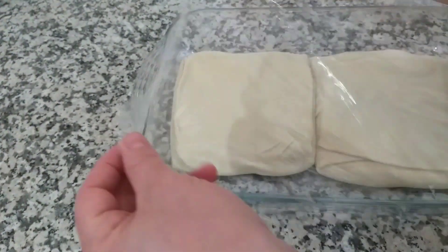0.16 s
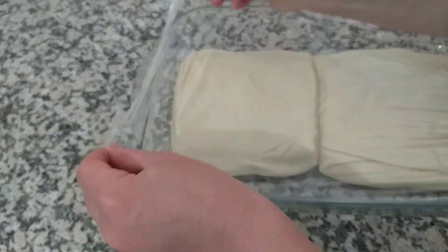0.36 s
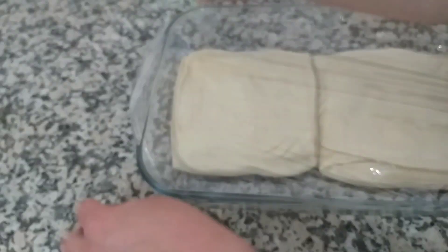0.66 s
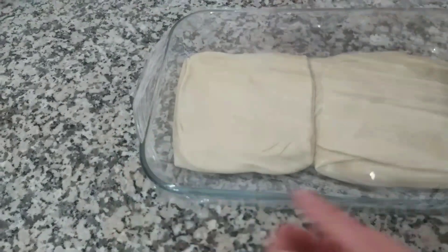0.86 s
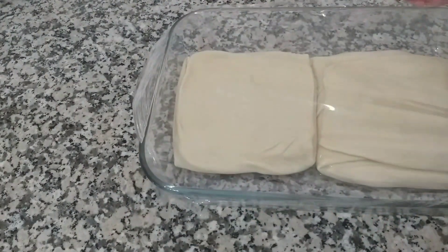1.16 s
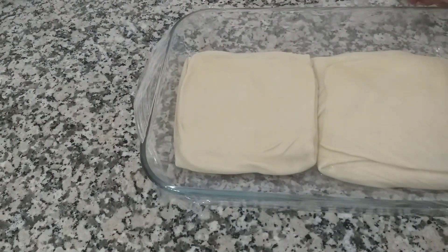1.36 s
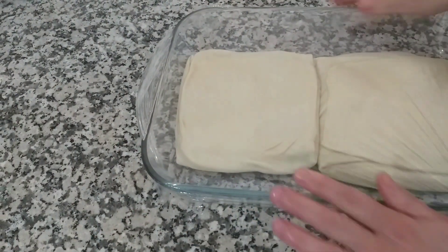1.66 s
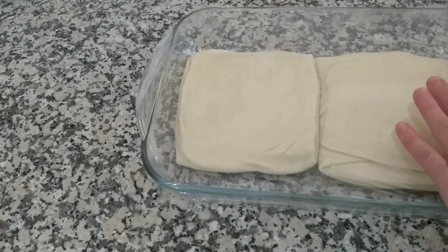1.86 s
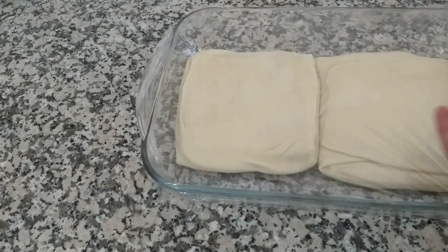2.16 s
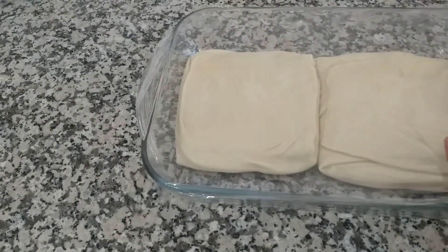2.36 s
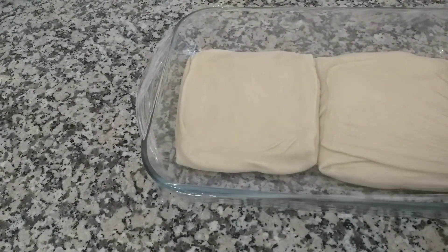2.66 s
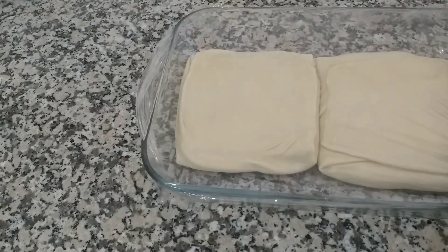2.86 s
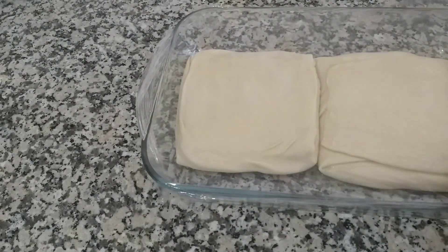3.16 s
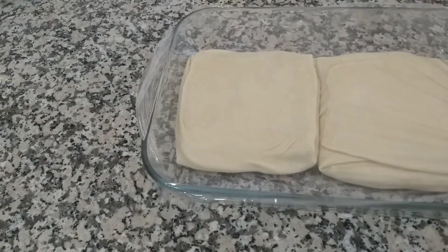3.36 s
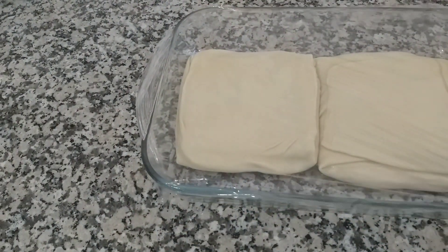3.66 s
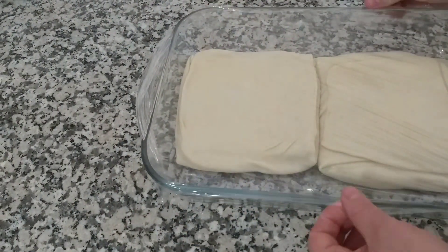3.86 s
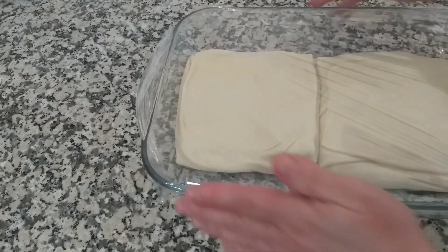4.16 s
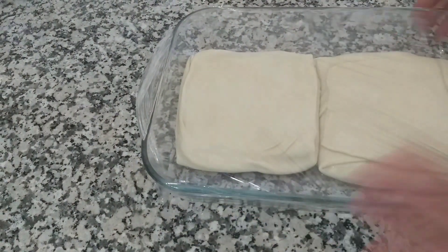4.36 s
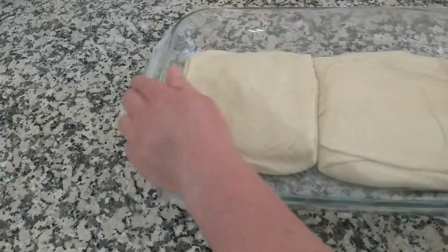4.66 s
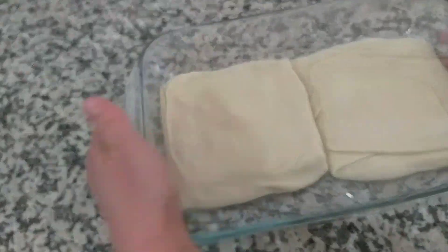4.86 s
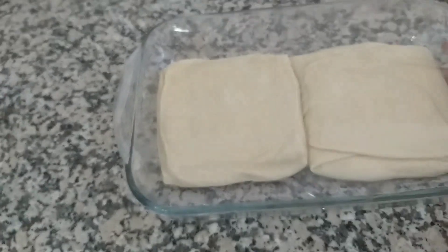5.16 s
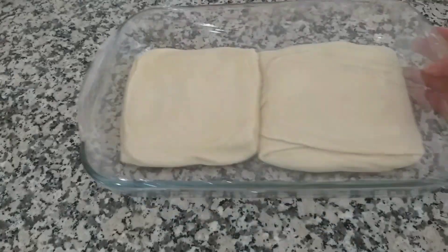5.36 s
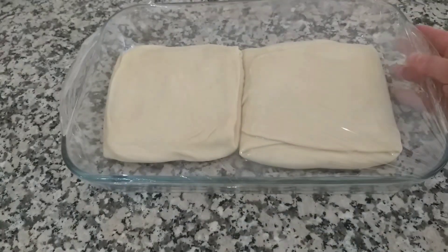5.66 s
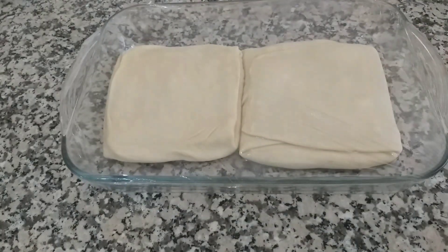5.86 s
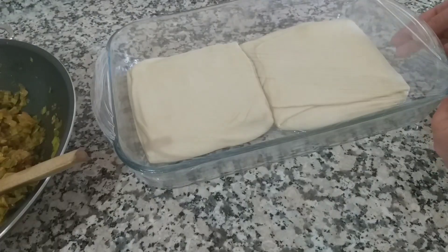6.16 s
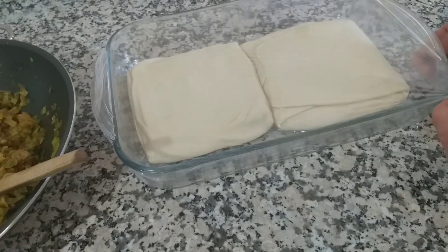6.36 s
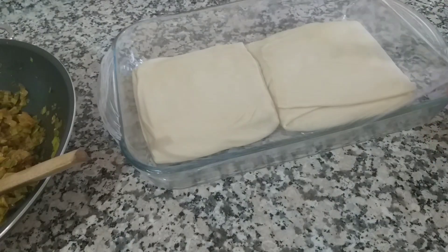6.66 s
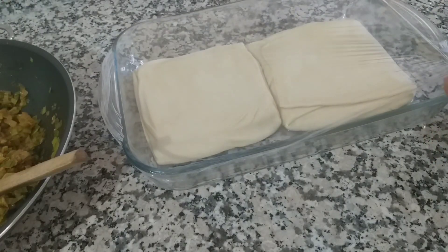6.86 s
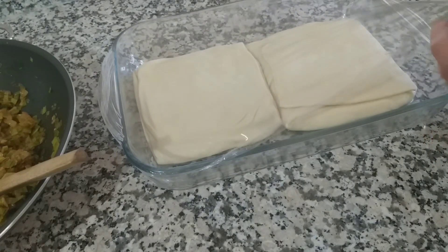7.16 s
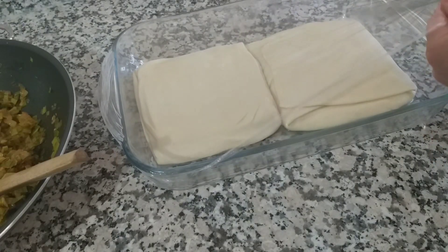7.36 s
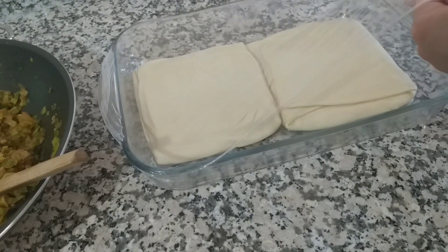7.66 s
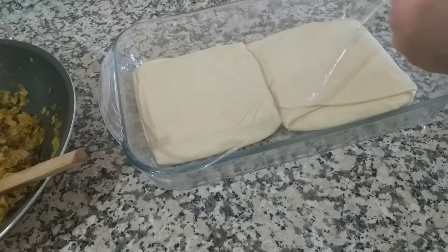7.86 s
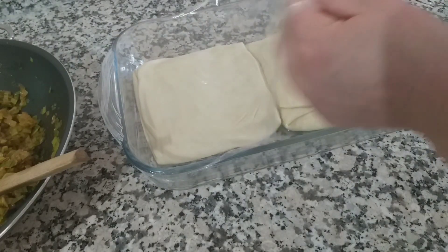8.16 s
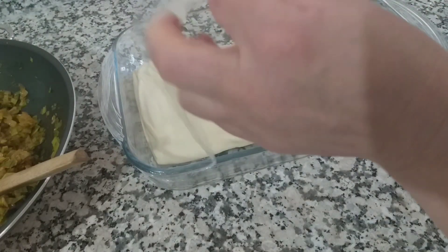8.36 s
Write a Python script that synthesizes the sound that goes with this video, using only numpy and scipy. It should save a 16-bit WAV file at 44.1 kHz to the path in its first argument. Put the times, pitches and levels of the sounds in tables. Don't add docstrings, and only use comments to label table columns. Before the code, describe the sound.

Close and dry in a quiet kitchen: plastic film crinkles, scuffs and snaps under busy hands, with low soft bumps on the counter. The densest crackle comes before three seconds, followed by lighter patting and isolated clicks. Around five seconds the glass dish slides with a low, rough scrape. A very brief dropout follows, then a faint low hum and peeling film, with one dense crackling burst and later scattered rustles.

```python
import sys
import numpy as np
from scipy import signal
from scipy.io import wavfile

SR = 44100
rng = np.random.default_rng(int(sys.argv[2]) if len(sys.argv) > 2 else 0)


def unload_wav(signal):
    wavfile.write(
        sys.argv[1],
        SR,
        np.round(np.clip(np.atleast_2d(signal).T, -1, 1) * 32767).astype(np.int16),
    )


def gain_from_db(level_db):
    decades = np.asarray(level_db, float) / 20
    return 10 ** decades


N = 375291
GAP_START_S, GAP_END_S = 5.989, 6.027


def rms_one(x):
    return x / np.sqrt(np.mean(x ** 2) + 1e-20)


def in_time(rows):
    s, *columns = np.transpose(rows)
    return [np.interp(np.arange(N) / SR, s, column) for column in columns]


def drift(rate):
    r = np.exp(-40 * np.pi * rate / SR)
    noise = rng.standard_normal(N // 20 + 2002)
    slow = signal.lfilter([1], [1, -2 * r, r * r], noise)[2000:]
    return np.interp(np.arange(N) / 20, np.arange(len(slow)), rms_one(slow))


def resonance(x, hz, width):
    r = np.exp(-np.pi * width / SR)
    poles = [1, -2 * r * np.cos(2 * np.pi * hz / SR), r * r]
    return signal.lfilter([(1 - r * r) / 2, 0, (r * r - 1) / 2], poles, x + 1e-18)


def band(x, low_hz, high_hz):
    return signal.sosfilt(signal.butter(2, [low_hz, high_hz], "band", fs=SR, output="sos"), x)


# f/Hz, density level/dB per Hz
AIR_SPECTRUM = [(30, 0.5), (120, -7), (300, -6), (700, -20.5), (1600, -5.5), (6000, -30), (16000, -34)]


def room_tone():
    white = rng.standard_normal((2, N))
    edges = 22 * 2 ** np.arange(0, 9.6, .5)
    hz, level_db = np.transpose(AIR_SPECTRUM)
    centres = edges[:-1] * 2 ** .25
    gains = gain_from_db(np.interp(np.log(centres), np.log(hz), level_db))
    air = sum(g * band(white[k % 2], edges[k], edges[k + 1]) for k, g in enumerate(gains))
    return gain_from_db(-80.5) * rms_one(air)


# f/Hz, level/dB
HUM_LINES = [(69, -77), (102, -78), (205, -83), (262, -83.5), (320, -89.5)]


def appliance_hum():
    drone = np.zeros(N)
    for hz, db in HUM_LINES:
        level = gain_from_db(db + 3.0 + 0.98 * drift(4.4))
        phase = 2 * np.pi * np.cumsum(hz * (1 + 0.0192 * drift(4.2))) / SR
        drone += level * np.sin(phase)
    return drone * (np.arange(N) > GAP_END_S * SR)


def kitchen(x):
    t60_s, wall_cut_hz = 0.077, 3100
    t = np.arange(round(.25 * SR)) / SR
    decay = gain_from_db(-60 * t / t60_s) * (t > .002)
    echoes = band(rng.standard_normal(len(t)), 67, wall_cut_hz) * decay
    return signal.fftconvolve(x, echoes / np.sqrt(np.sum(echoes ** 2)))[:N]


def rumble():
    low = band(band(rng.standard_normal(N), 70, 160), 45, 180)
    return gain_from_db(-75.5 + 2.0 * drift(7.5)) * rms_one(low)


# t/s, peak level/dB
HAND_THUMPS = [(0.113, -59.5), (0.73, -66), (1.298, -59), (1.488, -63), (1.601, -49), (2.213, -60),
               (2.477, -53.5), (2.718, -77), (2.875, -54), (3.095, -69), (3.615, -54.5), (3.915, -60),
               (4.051, -71.5), (4.303, -51), (4.62, -61), (6.672, -51), (6.896, -51), (7.497, -55)]


def thumps():
    out, t = np.zeros(N), np.arange(4000) / SR
    for s, peak_db in HAND_THUMPS:
        pulse = rng.standard_normal(len(t)) * t * np.exp(-t / 0.0053)
        thud = band(band(pulse, 83, 190), 49, 180)
        at = round(s * SR)
        out[at:at + len(t)] += gain_from_db(peak_db) * thud / np.abs(thud).max()
    return out


# t/s, level/dB
SLIDE_FRICTION = [
    (4.88, -100),
    (5.02, -97.5),
    (5.12, -101),
    (5.2, -76.5),
    (5.35, -78),
    (5.55, -98),
    (5.75, -77.5),
    (5.9, -86.5),
    (5.99, -97),
]
# f/Hz, bandwidth/Hz, level/dB
DISH_MODES = [(123.3, 12, 7.5), (292, 43, -1.5), (800, 170, -4.5), (1498, 96, -3), (1834, 100, -11),
              (2300, 120, -22.5)]


def dish_slide():
    level_db = in_time(SLIDE_FRICTION)[0] + 3.14 * drift(12.4)
    friction = rng.standard_normal(N) * gain_from_db(level_db)
    friction[:int(SLIDE_FRICTION[0][0] * SR) + 1] = 0
    friction[round(GAP_START_S * SR):] = 0
    return sum(gain_from_db(db) * np.sqrt(SR / width) * resonance(friction, hz, width) for hz, width, db in DISH_MODES)


# t/s at the middle, length/s, f/Hz, level/dB
COLOURED_BURSTS = [(0.238, 0.014, 800, -45), (0.86, 0.057, 330, -68), (0.813, 0.069, 760, -61),
                   (1.28, 0.035, 1050, -48.5), (1.749, 0.02, 945, -54.5), (1.843, 0.024, 883, -48),
                   (1.863, 0.06, 360, -51.5), (1.992, 0.075, 330, -56.5), (2.223, 0.062, 349, -49),
                   (2.225, 0.079, 237, -47), (2.279, 0.018, 1360, -49), (2.655, 0.24, 1030, -63),
                   (3.134, 0.089, 230, -55.5), (4.806, 0.071, 4500, -74.5), (5.002, 0.18, 2300, -67),
                   (5.254, 0.049, 6570, -68.5), (5.855, 0.05, 7140, -74.5), (4.953, 0.088, 5000, -66),
                   (1.614, 0.02, 1410, -49), (8.194, 0.16, 6030, -64.5), (8.2, 0.092, 13200, -58.5),
                   (8.41, 0.22, 1900, -63.5)]


def coloured_bursts():
    out, t = np.zeros(N), np.arange(N) / SR
    friction = rng.standard_normal(N) * gain_from_db(1.2 * drift(41))
    for s, length, hz, db in COLOURED_BURSTS:
        near = slice(round((s - 2 * length) * SR), round((s + 2 * length) * SR))
        patch = rms_one(resonance(resonance(friction[near], hz, 0.15 * hz), hz, 0.51 * hz))
        stroke = np.exp(-((t[near] - s) / (0.37 * length)) ** 4)
        out[near] += gain_from_db(db) * patch * stroke
    return out


# t/s, rustle level/dB
REST_RUSTLE = [(0, -71), (.5, -60), (.68, -69), (1.0, -70.5), (1.25, -67), (1.6, -83), (2.1, -63),
               (2.65, -58.5), (3.0, -82.5), (3.4, -67), (3.75, -75.5), (4.6, -67.5), (5.2, -70), (5.6, -79),
               (6.04, -72), (6.3, -63), (7.3, -64), (8.2, -65.5)]
# t/s at full force, hold/s, crackle level/dB, sheet level re crackle/dB
STRETCH_MOVES = [(0.08, 0.13, -45.5, -8), (0.144, 0.0065, -49.5, 13), (0.236, 0.057, -43, -8.5),
                 (0.377, 0.11, -51, -26), (0.467, 0.0049, -43.5, -5.5), (0.63, 0.0064, -43, -17),
                 (0.721, 0.084, -55, -18), (1.064, 0.038, -74, -14), (1.083, 0.13, -57, -19),
                 (1.276, 0.037, -41.5, -5), (1.341, 0.029, -43.5, -5.5), (1.395, 0.008, -47, -3),
                 (1.435, .03, -52, -1.5), (1.495, 0.0072, -47.5, 7), (1.607, 0.017, -47.5, -3),
                 (1.75, 0.17, -53.5, -5.5), (1.976, 0.029, -49, 4), (2.04, 0.038, -51.5, -4),
                 (2.133, 0.0084, -47, -2.5), (2.21, 0.029, -42, -3), (2.276, 0.0044, -47, 1.5),
                 (2.36, 0.074, -47.5, -16), (2.484, 0.0078, -45.5, 9.5), (2.697, .012, -46.5, 9.5),
                 (2.711, 0.064, -37.5, 0), (2.814, 0.02, -41.5, 1), (2.889, 0.019, -40, 1),
                 (3.095, 0.043, -39, -3), (3.158, 0.064, -40.5, -6.5), (3.199, .056, -42, -14)]
PAT_MOVES = [(3.342, 0.042, -55.5, -27), (3.38, 0.059, -51.5, -4), (3.5, 0.024, -59, -16),
             (3.605, 0.0029, -51, -12), (3.647, 0.007, -30, -16.5), (3.833, .015, -52.5, -18),
             (3.909, 0.0086, -39.5, 0), (3.919, 0.029, -48, 0), (4.045, 0.0042, -44.5, -10.5),
             (4.177, 0.02, -49.5, -21.5), (4.296, 0.034, -59, -12.5), (4.39, 0.07, -45, -13.5),
             (4.624, .01, -56, -9), (4.744, 0.021, -49.5, -18.5), (4.81, 0.026, -73, 13.5),
             (4.902, 0.15, -50.5, -30), (4.984, 0.039, -48, -6), (5.157, 0.025, -52.5, -42)]
PEEL_MOVES = [(6.09, 0.054, -56.5, -41), (6.29, 0.12, -51, -34), (6.373, .2, -49.5, -4),
              (6.593, 0.097, -37, 0), (6.688, 0.14, -51, 5.5), (6.786, 0.15, -42.5, -5.5),
              (6.888, 0.0083, -33.5, 3), (6.925, 0.11, -44, -4.5), (7.442, 0.071, -48, -36),
              (7.482, 0.11, -42, -4), (7.634, 0.0048, -36, -16), (7.657, 0.13, -47, -6),
              (7.7, 0.0056, -38.5, -10), (7.771, 0.0042, -39.5, -2.5), (8.353, 0.064, -45, -22),
              (8.432, .09, -49.5, -20)]


def handling():
    t = np.arange(0, N, 20) / SR
    rest_db = in_time(REST_RUSTLE)[0][::20]
    power = gain_from_db(rest_db + np.array([[0], [-10], [-6.5]])) ** 2
    # moves, flapping re sheet/dB, growth of rise and of fall time per second of hold
    kinds = [(STRETCH_MOVES, -9.5, 0.27, 0.12), (PAT_MOVES, -26.5, 0.035, 0.11), (PEEL_MOVES, -11.5, 0.2, 0.64)]
    for moves, flap_db, rise_per_hold, fall_per_hold in kinds:
        for s, hold, db, sheet_db in moves:
            rise_s = .009 + rise_per_hold * hold
            fall_s = 0.028 + fall_per_hold * hold
            away = np.maximum((s - t) / rise_s, (t - s - hold) / fall_s)
            force_db = db - 20 * np.clip(away, 0, 10)
            power += gain_from_db(force_db + np.array([[0], [sheet_db], [sheet_db + flap_db]])) ** 2
    return [np.interp(np.arange(N), t * SR, db) for db in 10 * np.log10(power)]


# f/Hz, bandwidth/Hz, level/dB
AIR_POCKET = [(230, 140, -3.5), (338.6, 54, -5)]


def air_pocket(busy):
    out = np.zeros(N)
    for hz, width, db in AIR_POCKET:
        push = rng.standard_normal(N) * busy
        out += gain_from_db(db - 7.5) * np.sqrt(SR / width) * resonance(push, hz, width)
    return out


def crinkle():
    crackle_db, sheet_db, flap_db = handling()
    sizes = gain_from_db(3.0 * np.minimum(rng.exponential(1, N), 5)) * rng.choice([-1, 1], N)
    busy = gain_from_db(3.8 * drift(45))
    folds_log_hz = np.log([330, 1380, 5500])
    out = np.zeros(N)
    for hz in np.geomspace(200, 15500, num=20):
        small = np.interp(np.log(hz), folds_log_hz, [0, 0, 1])
        large = np.interp(np.log(hz), folds_log_hz, [1, 0, 0])
        level_db = small * crackle_db + large * flap_db + (1 - small - large) * sheet_db
        clicks_per_s = 700 * (hz / 3000) ** .7 * busy
        clicks = np.roll(sizes, int(hz)) * (rng.random(N) < clicks_per_s / SR)
        ring = rms_one(resonance(resonance(clicks, hz, hz / 3.2), hz, hz / 2.3))
        out += ring * gain_from_db(level_db - 13.5 + 1.67 * drift(7.1))
    ticks = sizes * (rng.random(N) < 160 * busy / SR) * gain_from_db(crackle_db - 1)
    return out + band(ticks, 560, 16000) + gain_from_db(flap_db - 5.5) * air_pocket(busy)


# t/s, peak level/dB, ring f/Hz, body level re peak/dB
STRETCH_FLIPS = [(.029, -33.5, 7920, -21), (0.0573, -28, 6540, -21), (0.1176, -12.5, 3950, -5.5),
                 (.1459, -12.5, 4530, -18), (.15, -18.5, 4100, -2.5), (0.16, -28, 4570, -12),
                 (.187, -21.5, 5260, -23), (0.4681, -27, 4240, -7), (0.8975, -54.5, 5500, 9),
                 (1.1075, -32.5, 5000, -32), (1.1456, -31, 7000, -30), (1.262, -25.5, 5600, -23),
                 (1.274, -16, 5300, -6), (1.285, -20.5, 7450, -11), (1.3014, -25, 6150, -29),
                 (1.343, -23, 7450, -28), (1.3501, -20.5, 7060, -4.5), (1.3762, -36.5, 4950, 9),
                 (1.4433, -31, 5000, 0), (1.4915, -16.5, 4500, -5), (2.0484, -21, 11200, -24),
                 (2.0568, -16.5, 15100, -43), (2.0625, -13, 13340, -34), (2.1397, -31, 6100, -25),
                 (2.252, -31.5, 7670, -19), (2.356, -23.5, 5900, -37), (2.3665, -21, 3640, -41),
                 (2.376, -19.5, 3550, -38), (2.3798, -17, 13500, -38), (2.4899, -23, 3560, -20)]
PRESS_FLIPS = [(2.536, -28.5, 7400, -35), (2.5608, -24, 7244, -27.5), (2.6958, -15.5, 4970, -20),
               (2.6983, -14, 3750, -3), (2.721, 0, 3300, -8.5), (2.7234, -11, 3670, -3),
               (2.8085, -15, 4370, 3.5), (2.823, -12, 4740, -9), (2.884, -34, 5170, 19),
               (2.9007, -13.5, 5000, -26), (3.0902, -26.5, 4760, -8), (3.0964, -14.5, 5640, -16),
               (3.191, -29, 6800, -26.5), (3.392, -25, 4900, -6.5), (3.419, -40.5, 4560, -23),
               (3.4605, -38, 7400, -28), (3.5077, -32, 5080, -18), (3.518, -31.5, 7450, -40),
               (3.565, -42, 2800, -31.5), (3.597, -27.5, 2900, -27.5), (3.649, -18, 5000, -46),
               (3.6538, -20.5, 5080, -34), (3.8385, -38.5, 4750, -15), (3.9035, -17.5, 7000, -1),
               (3.92, -23.5, 4600, -29), (4.1779, -28, 5560, -32.5), (4.308, -30.5, 7850, -16),
               (5.1349, -36.5, 7600, -29.5), (5.169, -34.5, 7460, -27), (5.6558, -45, 7150, -17.5)]
PEEL_FLIPS = [(6.2599, -34, 7790, -31.5), (6.3212, -25.5, 5060, -34), (6.3343, -18, 5000, -27.5),
              (6.35, -17, 9600, -14.5), (6.377, -19, 3840, -7.5), (6.4198, -32, 5660, -6),
              (6.4813, -31, 3780, -23), (6.5181, -17.5, 5040, -4.5), (6.5507, -22.5, 4520, -41),
              (6.5636, -23.5, 4230, -1.5), (6.6106, -11.5, 3920, -1.5), (6.6579, -11, 6340, -2.5),
              (6.715, -24, 4350, 0.5), (6.7897, -13.5, 3770, -11), (6.805, -22.5, 5000, -30),
              (6.812, -20, 4070, -16), (6.8233, -24, 3820, -23), (6.839, -30.5, 4500, 7.5),
              (6.8621, -21.5, 3570, -4), (6.881, -27, 3480, -6), (7.209, -42.5, 5000, -7),
              (7.484, -43, 3930, -10), (7.5002, -24, 3020, -10), (7.511, -19.5, 13400, -21),
              (7.458, -36, 5000, -26), (6.585, -29, 4500, 1), (7.906, -43, 5000, -5)]


def snap(hz, body_hz, body_db):
    t = np.arange(2600) / SR
    flip, rag = rng.standard_normal((2, len(t)))
    burst = flip * np.minimum(t / 0.00023, 1) * gain_from_db(-60 * t / 0.0029)
    tail = gain_from_db(-18) * rag * gain_from_db(-60 * t / 0.027)
    drive = burst + tail
    bright = band(drive, .45 * hz, 16000) + 3.5 * resonance(drive, hz, .3 * hz)
    body = resonance(drive, body_hz, .5 * body_hz)
    return bright / np.abs(bright).max() + gain_from_db(body_db) * body / np.abs(body).max()


def snaps():
    out = np.zeros(N + 2600)
    for folds, sheet_hz in ((STRETCH_FLIPS, 1890), (PRESS_FLIPS, 1300), (PEEL_FLIPS, 1350)):
        for s, peak_db, hz, body_db in folds:
            body_hz = sheet_hz * 2 ** (.4 * rng.standard_normal())
            at = round(s * SR)
            out[at:at + 2600] += gain_from_db(peak_db - 2.8) * snap(hz, body_hz, body_db)
    return out[:N]


# f/Hz, bandwidth/Hz, level/dB, lag/samples
PORT_DIFFERENCES = [(1950, 520, -7, 0.41), (1900, 550, -16, 9.3), (10040, 1000, -8, 9.5),
                    (5000, 9000, -38.5, 3.1), (13500, 2700, -33, 2.7), (45, 120, -30, 3),
                    (5500, 2500, -32.5, 3)]


def scene():
    film = crinkle() + snaps() + coloured_bursts()
    background = room_tone() + appliance_hum() + rumble()
    mid = background + thumps() + dish_slide() + film + gain_from_db(-16) * kitchen(film)
    side = np.zeros(N)
    for hz, width, db, lag in PORT_DIFFERENCES:
        narrow = resonance(resonance(mid, hz, width), hz, width)
        side += gain_from_db(db) * np.roll(narrow, round(lag))
    low_hiss = rms_one(band(rng.standard_normal(N), 25, 300))
    side += gain_from_db(-103) * (low_hiss + 3.3 * rng.standard_normal(N))
    return np.array([mid + side, mid - side])


def band_limit(x):
    return signal.sosfilt(signal.butter(12, 17150, fs=SR, output="sos"), x)


# f/Hz, bandwidth/Hz, level/dB
MICROPHONE_RESPONSE = [(2500, 550, -2.5), (4500, 1300, 4.5), (7470, 1500, 5.5), (9800, 4200, -12),
                       (16000, 2900, 1.5)]


def record(dry):
    for hz, width, db in MICROPHONE_RESPONSE:
        dry = dry + (gain_from_db(db) - 1) * resonance(dry, hz, width)
    dry = dry + gain_from_db(-86) * rng.standard_normal(N)
    dry = signal.sosfilt(signal.cheby2(12, 60, 16600, fs=SR, output="sos"), dry)
    t = np.arange(N) / SR
    mix = dry * ((t < GAP_START_S) | (t > GAP_END_S))
    return band_limit(mix)


dry = scene()
out = record(dry)
unload_wav(out)
```